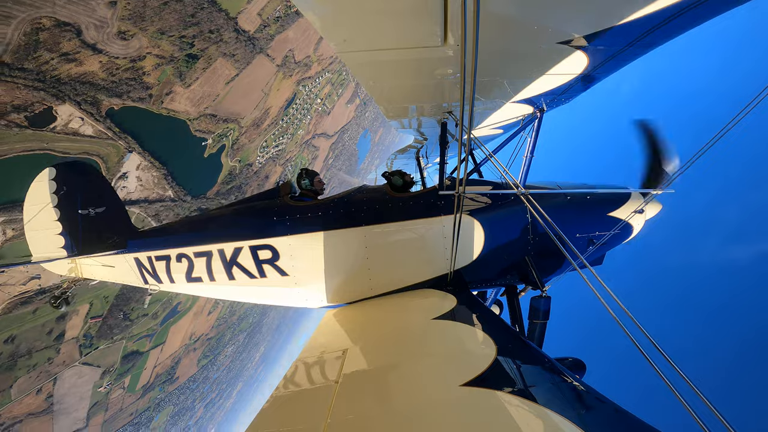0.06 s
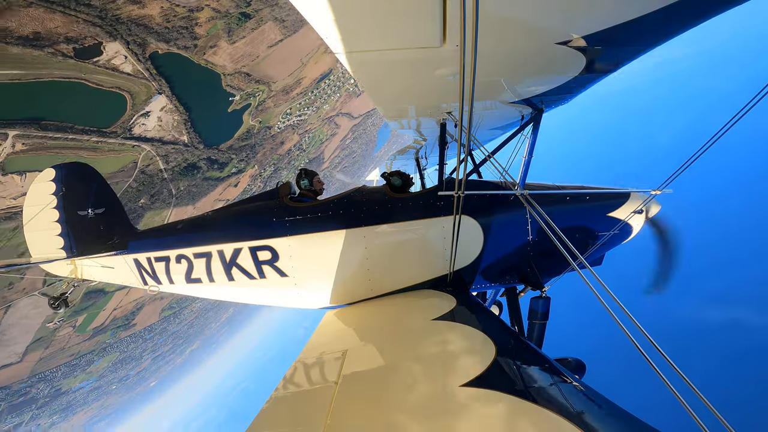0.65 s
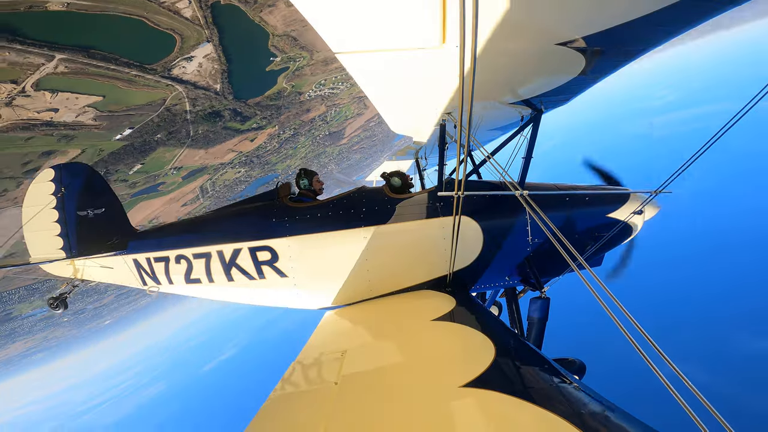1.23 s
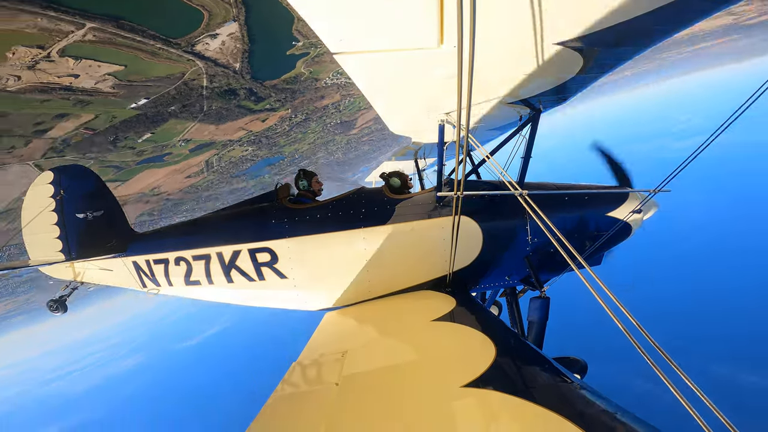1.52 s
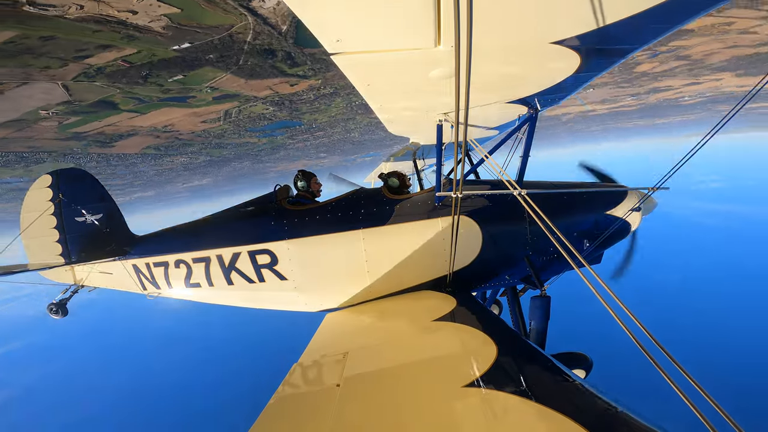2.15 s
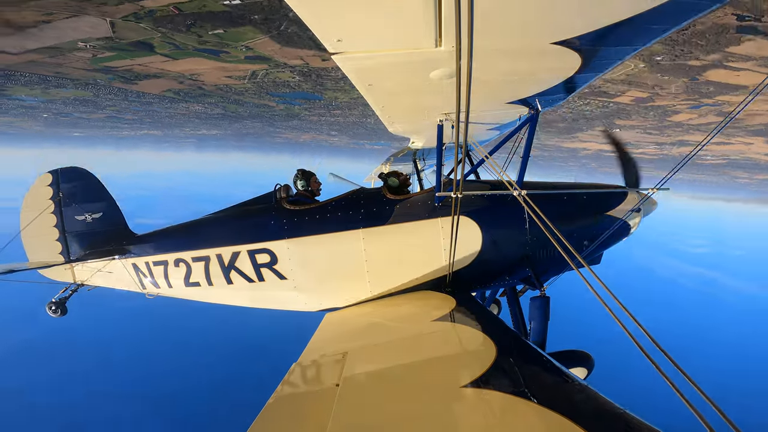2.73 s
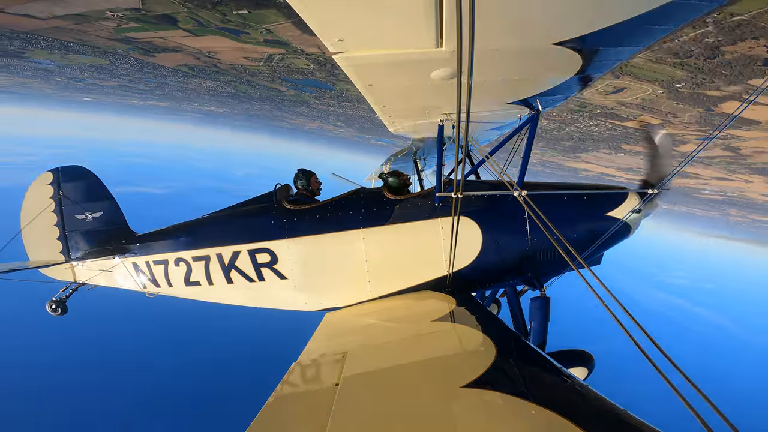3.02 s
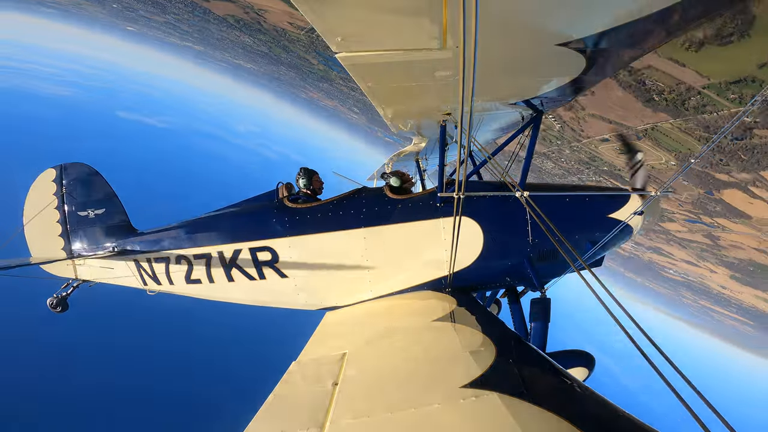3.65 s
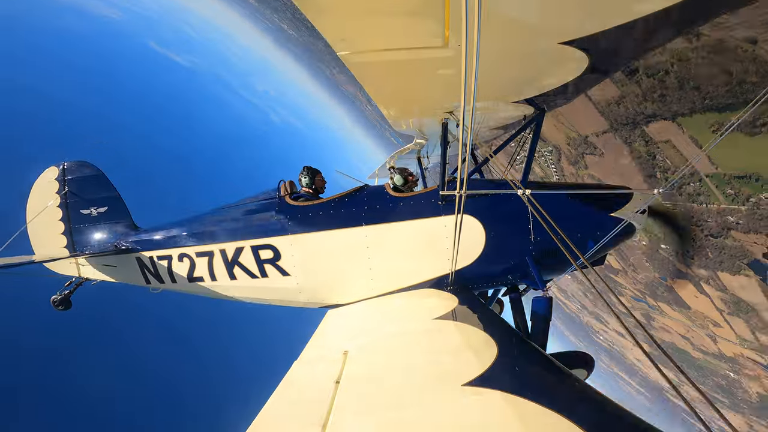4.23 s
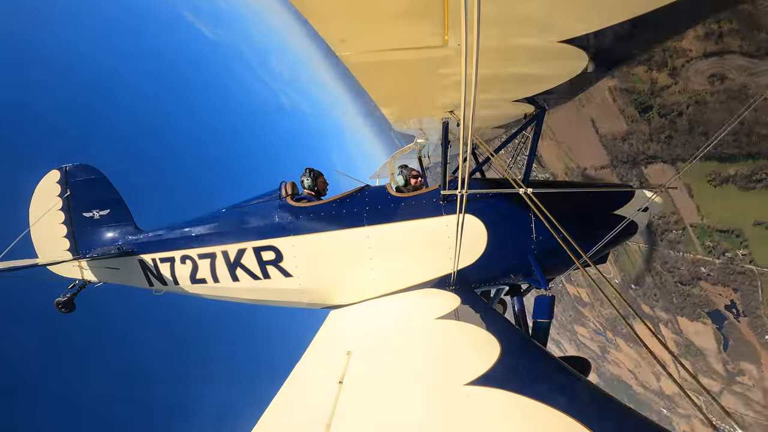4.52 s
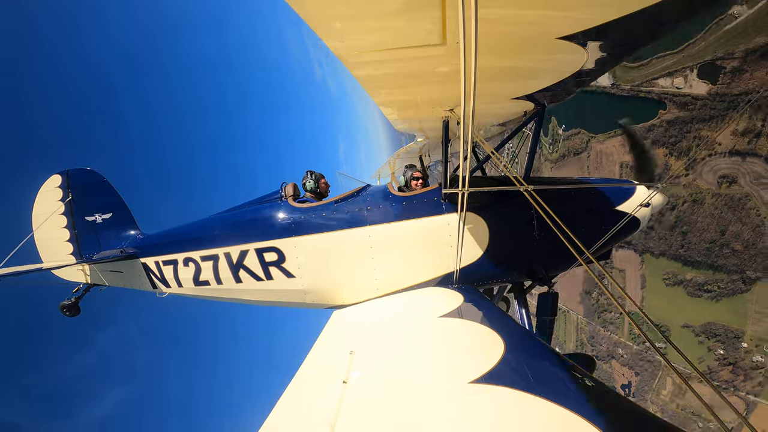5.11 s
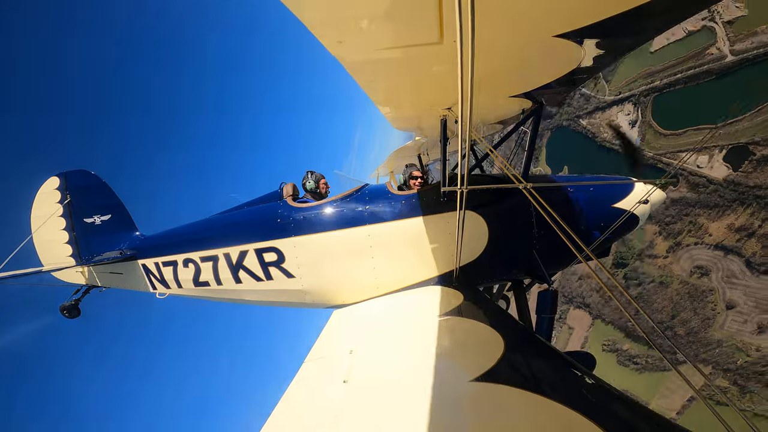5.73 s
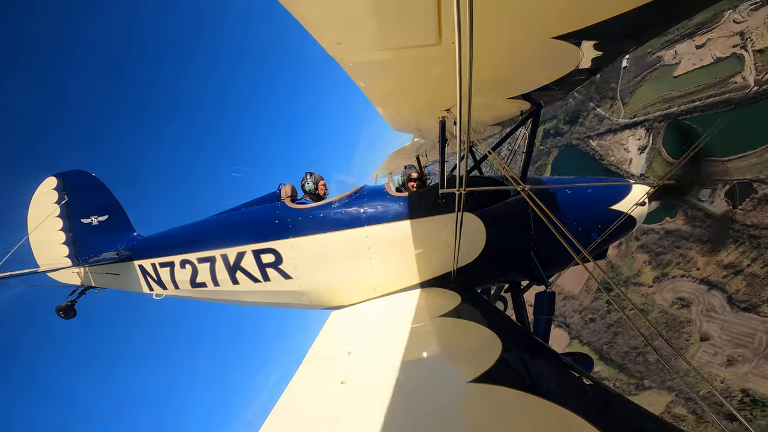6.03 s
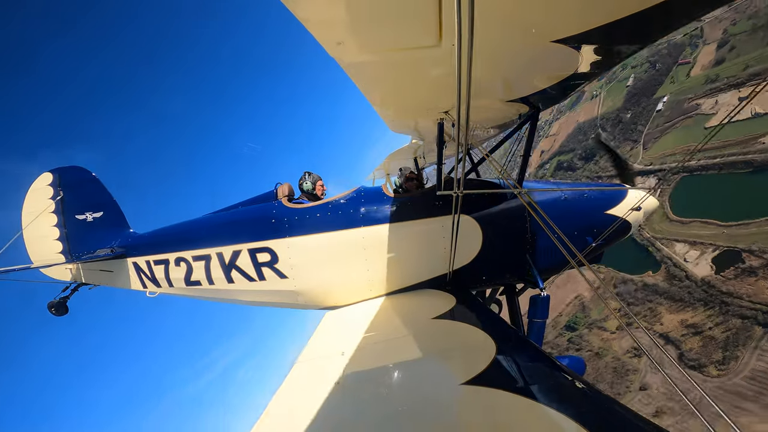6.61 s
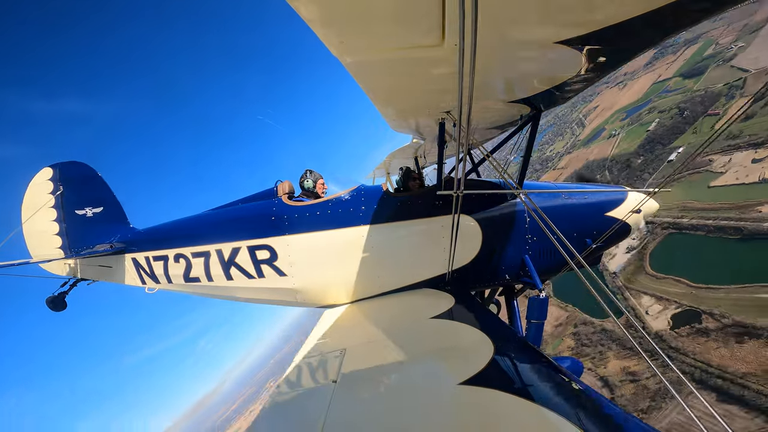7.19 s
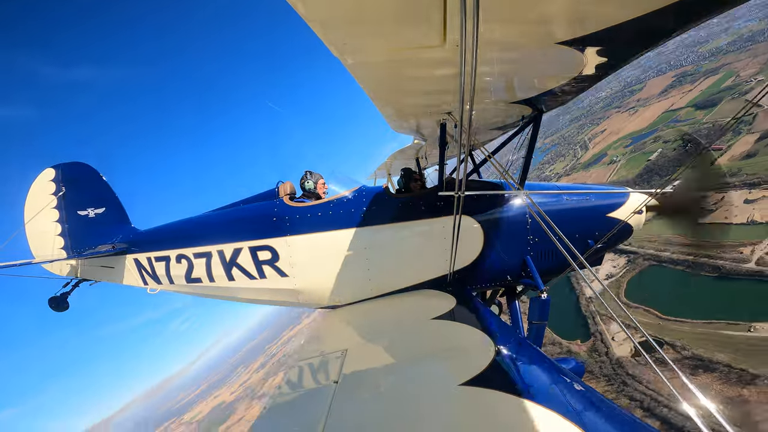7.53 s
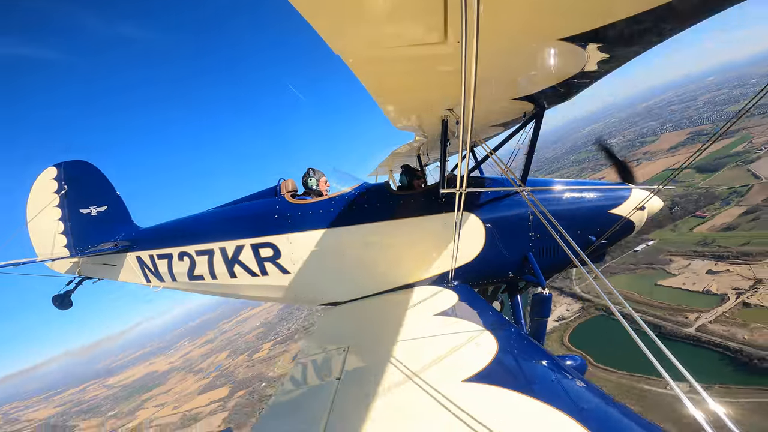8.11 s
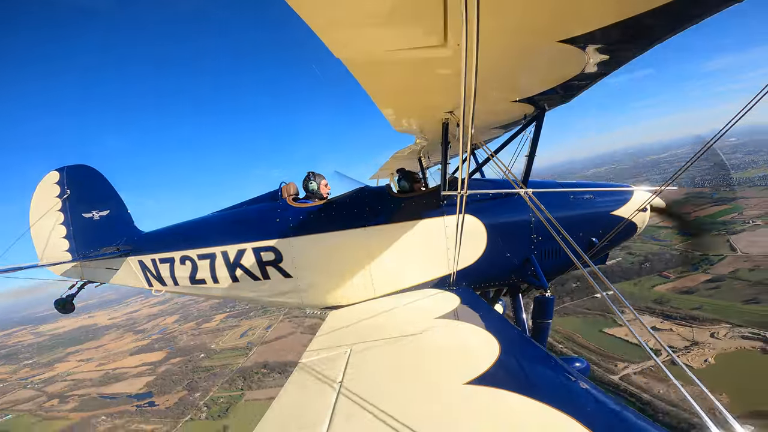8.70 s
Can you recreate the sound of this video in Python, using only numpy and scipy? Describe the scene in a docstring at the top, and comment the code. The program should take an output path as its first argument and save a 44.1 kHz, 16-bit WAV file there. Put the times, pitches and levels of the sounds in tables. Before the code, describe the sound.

Wind buffets a microphone on the wing of a small propeller plane, over a deep, throbbing engine hum with a rough exhaust. A few pops come early, then a short burst of hard chopping near the middle. As the plane gathers speed in open air, the slipstream builds in surges to a loud, hissing rush with faint rising whistles, while the engine keeps droning.

```python
"""A throbbing drone at about 83 beats a second: a small biplane's four-cylinder engine and propeller,
heard from out on the wing through the back half of a loop. Unequal cylinders puff and pop in the exhaust.
As the dive gathers speed the slipstream swells and the bracing wires shed vortices, whistling ever higher.
Gusts buffet the microphone and weaken the hum; its housing colours the rushing air and exhaust noise."""
import sys
import numpy as np
from scipy import signal
from scipy.fft import rfft, irfft, next_fast_len
from scipy.io import wavfile

SR = 44100
rng = np.random.default_rng(int(sys.argv[2]) if len(sys.argv) > 2 else 0)


def dump(signal):
    """Clip the signal to [-1, 1] and save it as 16-bit WAV at the path in sys.argv[1]."""
    limited = np.clip(np.atleast_2d(signal).T, -1, 1)
    pcm = np.round(limited * 32767).astype(np.int16)
    wavfile.write(sys.argv[1], SR, pcm)


N = 394694
TIME = np.arange(N) / SR
FREQS_HZ = np.maximum(np.fft.rfftfreq(N, 1 / SR), 1)


def from_db(db):
    """Decibels to gain."""
    return 10 ** (np.asarray(db) / 20)


def curve(rows):
    """Breakpoints interpolated to every sample."""
    return np.interp(TIME, *np.transpose(rows))


def drift(rate_hz):
    """Low-passed noise, mean 0, rms 1."""
    size = next_fast_len(N, real=True)
    rolloff = 1 + (np.fft.rfftfreq(size, 1 / SR) / rate_hz) ** 4
    slow = irfft(rfft(rng.standard_normal(size)) / rolloff, size)[:N]
    return (slow - slow.mean()) / slow.std()


def swell(at_s, half_s):
    """Gaussian rise and fall, height 1."""
    return np.exp(-((TIME - at_s) / half_s) ** 2)


def swells_db(rows):
    """Sum of swells, each with its own height."""
    return sum(db * swell(at_s, half_s) for at_s, half_s, db in rows)


# Housing resonances and hollows: f/Hz, width/Hz, gain/dB
HOUSING_MODES = [(195, 24, 3), (318, 100, 4.5), (503, 20, 2.5), (590, 30, 4), (630, 40, -5),
                 (850, 100, 5.5), (918, 75, 7.5), (1018, 92, 12.3), (1105, 60, -4), (1205, 120, 5.8),
                 (1835, 500, 8.5), (2350, 475, -5.3), (2800, 800, 8.5), (4330, 800, 7), (5620, 380, 5.5),
                 (6650, 400, 2.5), (7130, 400, -2), (7800, 580, 3), (9200, 1240, 3.3), (12600, 900, 3.5)]

def air_noise(spectrum, flow=1):
    """Turbulence gated by the flow, coloured by its spectrum and the housing; rms 1 at flow 1."""
    hz, db = np.transpose(spectrum)
    colour_db = np.interp(np.log(FREQS_HZ), np.log(hz), db)
    for centre_hz, width_hz, peak_db in HOUSING_MODES:
        colour_db += peak_db / (1 + (2 * (FREQS_HZ - centre_hz) / width_hz) ** 2)
    skirts = np.minimum(FREQS_HZ / hz[0], 1) ** 2 * np.minimum(hz[-1] / FREQS_HZ, 1) ** 6
    gain = from_db(colour_db) * skirts
    return irfft(rfft(rng.standard_normal(N) * flow) * gain, N) / np.sqrt(np.mean(gain ** 2))


def whistle(hz, half_width_hz, db, flutter_db):
    """Noise band around a wire's shedding pitch, which wanders with the eddies."""
    phase = 2 * np.pi * np.cumsum(hz * (1 + .009 * drift(5))) / SR
    gain = from_db(db + flutter_db * drift(5))
    return gain * (drift(half_width_hz) * np.cos(phase) + drift(half_width_hz) * np.sin(phase))


# Thin whistles: t/s, half-length/s, f/Hz, glide/(Hz/s), level/dB
THIN_WHISTLES = [(3.65, .3, 3150, 650, -54), (3.95, .2, 4050, 1300, -55), (3.9, .35, 6620, 700, -68),
                 (4.28, .2, 7020, 700, -70), (4.3, .25, 4450, 300, -58), (5.35, .35, 4700, 600, -56.5),
                 (5.5, 0.3, 8700, 100, -72), (6.15, .2, 6250, 1100, -62.5), (6.45, .35, 8780, 600, -70),
                 (6.75, .33, 6680, 300, -61), (6.7, .2, 7250, 500, -65), (7.3, .3, 7450, 250, -63.5),
                 (7.85, .45, 7830, 150, -61), (7.7, .45, 8900, 450, -65.5), (8.3, .35, 11230, 400, -77)]

def wires(airspeed_m_s, doublings, hz_per_m_s=125):
    """One wire sheds vortices at a pitch in step with airspeed; thinner whistles glide in and out."""
    fade_db = 8 * np.maximum(TIME - 8.0, 0)   # the nose comes level
    wire_db = -61.5 - 2.5 * doublings - fade_db
    out = whistle(hz_per_m_s * airspeed_m_s, half_width_hz=480, db=wire_db, flutter_db=1.0)
    for at_s, half_s, hz, glide_hz_s, db in THIN_WHISTLES:
        pitch_hz = hz + glide_hz_s * (TIME - at_s)
        out += swell(at_s, half_s) * whistle(pitch_hz, half_width_hz=260, db=db, flutter_db=0.5)
    return out


# Airflow spectra: f/Hz, relative level/dB
RUSH_SPECTRUM = [(110, -20), (400, .5), (800, -8.5), (1500, -11), (2400, -19.5), (2900, -27), (3600, -24.5),
                 (5500, -38.5), (7000, -41.5), (9300, -57.5), (15000, -85.5)]
HISS_SPECTRUM = [(7000, 1.5), (9400, -3.5), (10200, -11.5), (12500, -20.5), (15000, -32.5)]
# Slipstream surges: t/s, half-length/s, gain/dB
RUSH_SURGES = [(.12, 0.18, 3.5), (5.56, 0.33, 6), (6.79, 0.22, 3), (8.202, 0.41, 2)]
# Slipstream hiss: t/s, level/dB
HISS_DB = [(0, -80.5), (4.6, -75), (5.0, -69), (5.4, -61.5), (6.1, -64.5), (6.8, -57.5), (7.4, -60),
           (8.1, -54.5), (8.95, -55)]

def slipstream(doublings):
    """Rushing air grows with airspeed and surges; a fine hiss joins in the dive."""
    rush_db = -26.5 + 11 * doublings + swells_db(RUSH_SURGES) + 0.44 * drift(15)
    rush = from_db(rush_db) * air_noise(RUSH_SPECTRUM)
    return rush + from_db(curve(HISS_DB)) * air_noise(HISS_SPECTRUM)


# Gusts: t/s, half-length/s, level/dB
GUST_SWELLS = [(0.089, 0.12, -25), (1.097, 0.67, -27), (1.618, 0.35, -25), (2.697, 0.93, -27.5),
               (3.352, 0.41, -25), (4.831, 0.28, -22), (5.352, .25, -31.5), (6.404, 0.29, -30),
               (7.8, .3, -30), (8.6, .2, -34)]
# Buffeting spectrum: f/Hz, relative level/dB
BUFFET_SPECTRUM = [(20, -13), (30, 1.5), (44, 1.5), (55, -2.5), (70, -1), (100, -9), (130, -15)]

def buffeting(calm_db=-43, full_gust_db=-19.5):
    """Turbulence at the microphone. Returns its rumble and the gustiness (1 = full gust)."""
    gust_power = sum((from_db(db) * swell(at_s, half_s)) ** 2 for at_s, half_s, db in GUST_SWELLS)
    strength = np.sqrt(from_db(calm_db) ** 2 + gust_power)
    rumble = from_db(0.8) * strength * air_noise(BUFFET_SPECTRUM)
    return rumble, strength / from_db(full_gust_db)


def puffs(beat, depth_db, uneven_db, lag_rad):
    """Gate of rms 1: one gas puff per firing, from four unequal cylinders."""
    imbalance_db = uneven_db * (np.cos(beat / 2) + np.cos(beat / 4))
    gate = from_db(depth_db * np.cos(beat - lag_rad) + imbalance_db)
    return gate / np.sqrt(np.mean(gate ** 2))


# Chop and crackle spectra: f/Hz, relative level/dB
CHOP_SPECTRUM = [(150, -6.5), (400, -5), (750, 5), (1000, -9.5), (1400, -0.5), (2000, -22), (3000, -26)]
CRACKLE_SPECTRUM = [(3000, 0), (5000, -1), (7300, -3), (8500, -11), (10000, -22)]

def chopping(beat, clicks_per_s=330):
    """Brief hard chopping as the nose points down, trailing off in fine crackle."""
    chop = from_db(-29.5) * swell(4.23, 0.14) * puffs(beat, depth_db=5, uneven_db=-1, lag_rad=-0.47)
    clicks = (rng.random(N) < clicks_per_s / SR) * np.sqrt(SR / clicks_per_s)
    crackle = from_db(-59) * swell(4.34, .17) * clicks
    return air_noise(CHOP_SPECTRUM, chop) + air_noise(CRACKLE_SPECTRUM, crackle)


# Exhaust pops: t/s, thud level/dB, ring level/dB
EXHAUST_POPS = [(.231, -25, -13), (2.451, -23, -33), (2.513, -25, -33), (2.610, -17.5, -27),
                (2.705, -22, -29), (4.057, -22, -21)]
# Pop spectra: f/Hz, relative level/dB
THUD_SPECTRUM = [(200, -1.5), (450, 7), (750, -3.5), (1000, -12.5), (1400, -6.5), (2000, -16.5),
                 (3000, -22.5), (4500, -36)]
RING_SPECTRUM = [(800, -5), (950, 0), (1150, -6)]

def pops(attack_s=0.0014, decay_s=0.006):
    """Quick rushes of gas, part thud, part ring, gone within a beat or two."""
    at_s, thud_db, ring_db = np.transpose(EXHAUST_POPS)
    age_s = TIME - at_s[:, None]
    bursts = np.clip(age_s / attack_s, 0, 1) * np.exp(-np.abs(age_s) / decay_s)
    thuds = air_noise(THUD_SPECTRUM, from_db(thud_db) @ bursts)
    return thuds + air_noise(RING_SPECTRUM, from_db(ring_db) @ bursts)


# Engine orders, quarters from unequal cylinders: f/beat rate, base level/dB
ORDERS = [(.5, -40.5), (.75, -38), (1.25, -44.5), (1.75, -50.5), (2.25, -45), (3, -41.5), (3.5, -42),
          (4, -39), (4.5, -47), (5, -41), (5.5, -45.5), (6, -41), (7, -55), (8, -55), (10.25, -51),
          (11, -49.5), (12, -51.5), (12.25, -55), (12.5, -51.5)]
# Orders bloom or fade as the airflow turns: t/s, half-length/s, f/beat rate, gain/dB
ORDER_BLOOMS = [(.35, .25, 4, 4), (.35, .4, 6, 7), (.4, .5, 12.25, 5), (1.4, .5, .5, 10), (1.5, .25, 4, 4),
                (1.5, .35, 3.5, 10), (2.0, 1.0, 6, -8), (2.3, .35, 10.25, 8), (2.45, .35, 5, 9),
                (3.5, .6, 5, 3), (4.65, .2, 11, 11), (4.9, .3, 4, 3), (5.45, .3, 3, 9), (5.45, .25, 3.5, 6),
                (5.5, .35, 11, 6), (5.55, .35, 12.5, 8), (5.6, .4, 12.25, 10), (5.9, .7, 6, 4),
                (6.75, .3, 11, 13), (7.1, .35, 5, 6), (7.1, 1.2, 12, 6.5), (7.2, .5, 12.5, 7),
                (7.0, .8, 4.5, 7), (8.2, .4, 12.25, 9), (8.5, .4, 11, 6), (8.5, .55, 5, 11),
                (8.5, .5, 4, 2), (8.4, .6, 6, -4), (8.4, .5, 2.25, 7), (8.4, .5, 1.75, 6)]

def exhaust_tones(beat, fade_db=2.5, scatter_rad=0.056):
    """Engine orders fade in the slipstream and scatter in phase, the highest scattering most."""
    out = np.zeros(N)
    for order, db in ORDERS:
        bloom_db = swells_db((at_s, half_s, gain_db)
                             for at_s, half_s, blooming, gain_db in ORDER_BLOOMS if blooming == order)
        phase = order * (beat + scatter_rad * drift(6.8)) + rng.uniform(0, 2 * np.pi)
        out += from_db(db + bloom_db + fade_db * drift(3.5)) * np.cos(phase)
    return np.sqrt(2) * out


# Exhaust spectra: f/Hz, relative level/dB
ROAR_SPECTRUM = [(110.0, -6.5), (190.0, -0.5), (300.0, -9), (450.0, -5.5), (700.0, -20.5), (1500.0, -25)]
RASP_SPECTRUM = [(110, -1.5), (300, 2), (600, -2.5), (1200, -13.5), (2300, -19.5), (2850, -20.5),
                 (3700, -26.5), (4250, -27.5), (5200, -30), (6500, -38), (9400, -52.5), (15000, -68)]
SIZZLE_SPECTRUM = [(7500, 3), (9400, -2), (10300, -4.5), (15000, -13.5)]
# Exhaust reaching the wing: t/s, level/dB
RASP_DB = [(0, -28.5), (.35, -30), (.8, -32.5), (1.55, -32), (2.0, -33), (2.5, -33.5), (2.85, -37),
           (3.2, -36), (3.5, -31), (3.95, -31), (4.6, -39), (5.2, -30), (6.2, -34.5), (7.4, -35.5),
           (8.2, -29.5), (8.95, -28.5)]
SIZZLE_DB = [(0, -64), (.85, -68), (1.75, -66), (2.5, -69), (2.9, -70), (3.6, -68), (4.03, -67),
             (4.08, -75), (4.6, -76), (5.3, -68.5), (8.95, -68)]
# Throaty roar surges: t/s, half-length/s, gain/dB
ROAR_SWELLS = [(.38, .09, 2), (1.52, .09, 3), (2.65, .1, 2), (5.2, .13, 1.5), (8.15, .12, 1.5)]

def exhaust(beat, doublings, gustiness):
    """Pulsed gas: tones, low roar, rasp and sizzle. Tones and roar partly follow the rasp's level."""
    rasp_db = curve(RASP_DB)
    roar_db = -29 + 0.59 * (rasp_db + 33) + 0.7 * doublings + 1.5 * gustiness
    tones = from_db(roar_db - roar_db.mean()) * exhaust_tones(beat)
    roar_flow = puffs(beat, depth_db=2.5, uneven_db=1.0, lag_rad=-0.39)
    rasp_flow = puffs(beat, depth_db=1.5, uneven_db=0.5, lag_rad=1.8)
    sizzle_flow = puffs(beat, depth_db=2.0, uneven_db=0.5, lag_rad=1.8)
    roar = from_db(roar_db + swells_db(ROAR_SWELLS)) * air_noise(ROAR_SPECTRUM, roar_flow)
    rasp = from_db(rasp_db + 0.49 * drift(30)) * air_noise(RASP_SPECTRUM, rasp_flow)
    sizzle = from_db(curve(SIZZLE_DB)) * air_noise(SIZZLE_SPECTRUM, sizzle_flow)
    return tones + roar + rasp + sizzle


def throb_db(gustiness, depth_db=1.2, rate_hz=15.4):
    """Short dips of the hum in gusts, every other one deeper."""
    cycle = 2 * np.pi * rate_hz * TIME + 0.41 * drift(2.6)
    dips = ((1 + np.cos(cycle)) / 2) ** 2 * (1 + np.cos(cycle / 2) / 2)
    return depth_db * gustiness * (dips.mean() - dips)


# Brief hum sags: t/s, depth/dB, half-length/s
HUM_SAGS = [(1.535, 6, 0.012), (1.657, 10, 0.012), (1.991, 10, 0.0066), (3.298, 18, 0.046),
            (4.686, 3, 0.019), (4.834, 2.5, .04), (4.933, 11, 0.018)]
# Cylinder imbalance, one shake in four beats: t/s, depth/dB
SHUDDER_DB = [(0, .4), (3.6, .4), (4.15, .05), (5.2, .55), (6.5, .65), (7.15, .1), (7.8, .85), (8.95, .95)]
# Hum's octave, strong in inverted flight: t/s, level/dB
OCTAVE_DB = [(0, -22), (.13, -33), (.3, -29), (.45, -33), (.7, -28), (1.12, -27.5), (1.48, -18),
             (1.82, -26), (2.22, -20.5), (2.76, -23), (3.15, -21), (3.33, -17.3), (3.45, -26),
             (3.86, -20.3), (4.05, -26), (4.27, -39), (4.62, -29.5), (4.97, -29), (5.08, -39), (5.5, -24.8),
             (5.9, -34), (8.3, -34.5), (8.55, -29), (8.95, -36)]

def drone(beat, gustiness, duck_db=5.5):
    """Propeller and exhaust sum to a strong, nearly pure hum and its octave; gusts weaken the hum."""
    hum_db = -10.5 - duck_db * gustiness + throb_db(gustiness)
    hum_db += curve(SHUDDER_DB) * np.cos(beat / 4)
    hum_db -= sum(depth_db * swell(at_s, half_s) for at_s, depth_db, half_s in HUM_SAGS)
    hum_db += 0.48 * gustiness * drift(27)
    hum = from_db(hum_db) * np.cos(beat)
    polarity = np.tanh((TIME - 4.25) / .08)   # the octave cancels, then returns inverted
    octave = polarity * from_db(curve(OCTAVE_DB) + 0.6 * drift(4.7)) * np.cos(2 * beat)
    return np.sqrt(2) * (hum + octave)


# Firing rate: t/s, f/Hz
FIRING_HZ = [(0, 82.4), (3, 83.0), (3.8, 82.6), (4.3, 83.1), (4.9, 82.7), (5.2, 83.8), (5.8, 83.4),
             (6.6, 84.1), (7.9, 83.1), (8.95, 82.9)]

def engine(doublings, gustiness):
    """Drone, exhaust and chopping share one firing phase; pops come on top."""
    beat = 2 * np.pi * np.cumsum(curve(FIRING_HZ)) / SR + np.pi / 2
    return drone(beat, gustiness) + exhaust(beat, doublings, gustiness) + chopping(beat) + pops()


# Airspeed, slowest over the top, fastest at pull-out: t/s, speed/(m/s)
AIRSPEED_M_S = [(0, 24), (1.2, 22), (3.2, 22), (3.8, 26.5), (4.3, 34.5), (5.4, 37.5), (6.15, 49), (7.2, 59),
                (7.7, 62.8), (8.95, 62.3)]

def scene(dive_m_s=60):
    """Air, engine and wires in mono, driven by airspeed and gusts."""
    airspeed_m_s = curve(AIRSPEED_M_S)
    doublings = np.log2(airspeed_m_s / dive_m_s)
    rush = slipstream(doublings)
    rumble, gustiness = buffeting()
    return (rush + rumble + engine(doublings, gustiness) + wires(airspeed_m_s, doublings))[None]


def record(dry, fade_in_s=.004, cutoff_hz=15700):
    """Click-free onset, steep low-pass."""
    lowpass = signal.cheby2(14, 60, cutoff_hz, fs=SR, output="sos")
    return signal.sosfilt(lowpass, dry * np.minimum(TIME / fade_in_s, 1))


dry = scene()
out = record(dry)
dump(out)
```